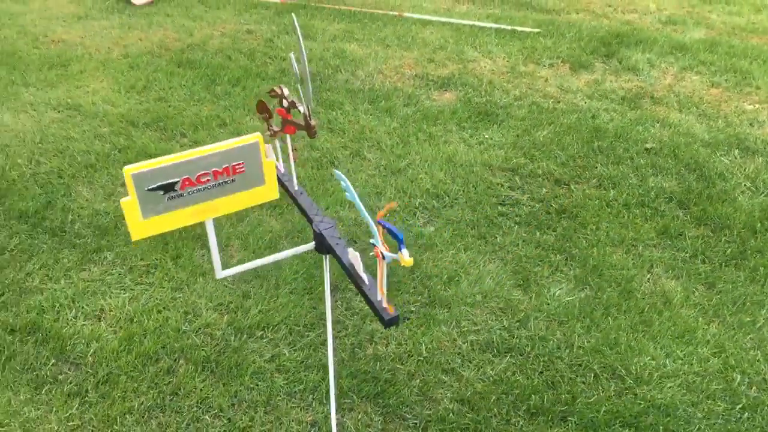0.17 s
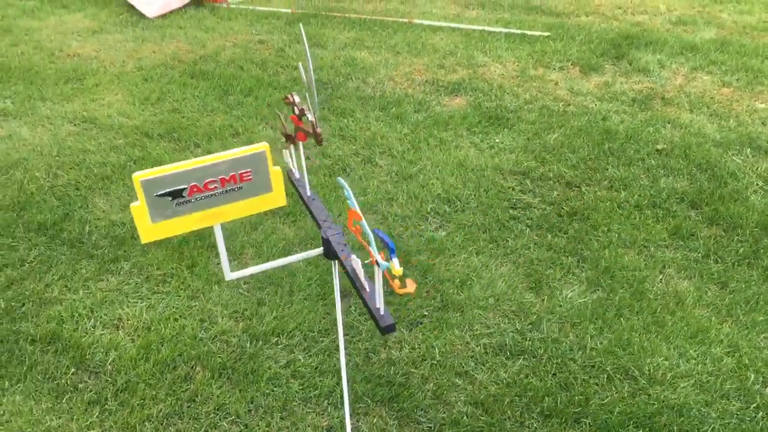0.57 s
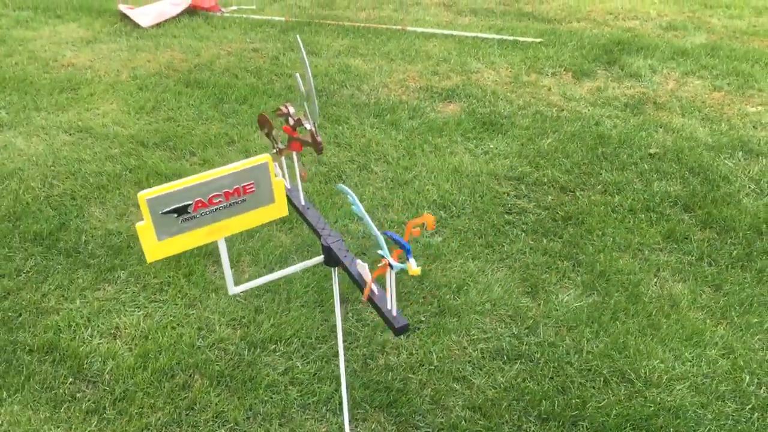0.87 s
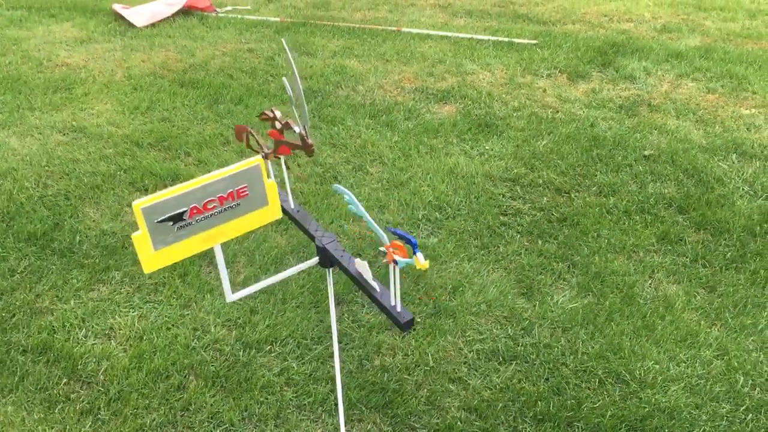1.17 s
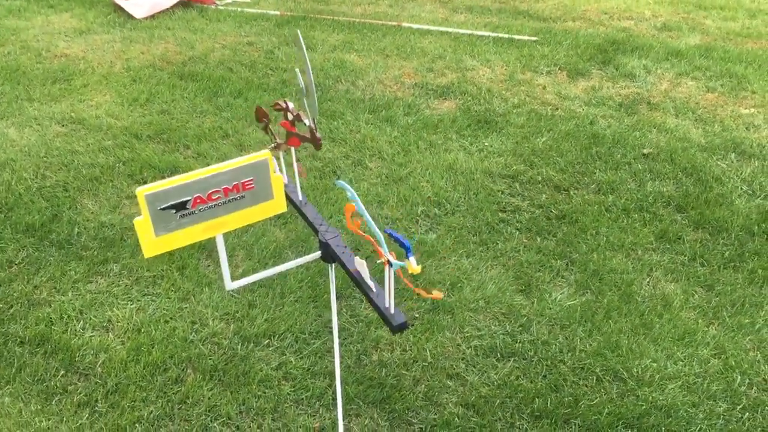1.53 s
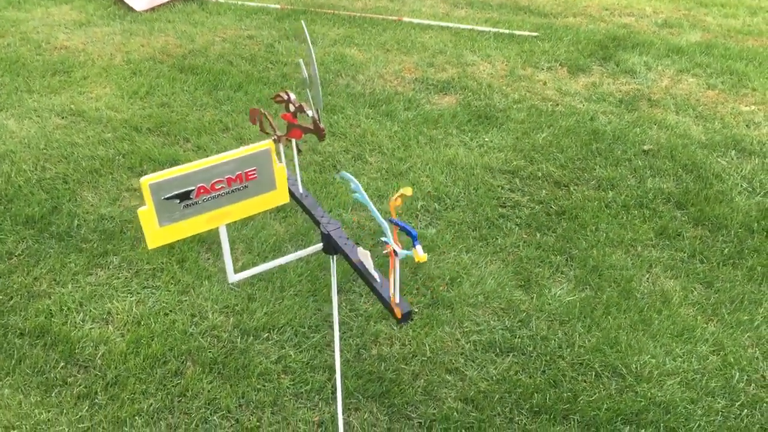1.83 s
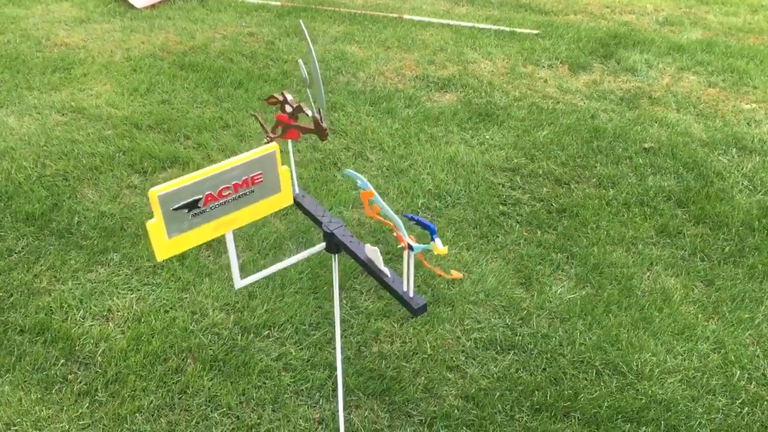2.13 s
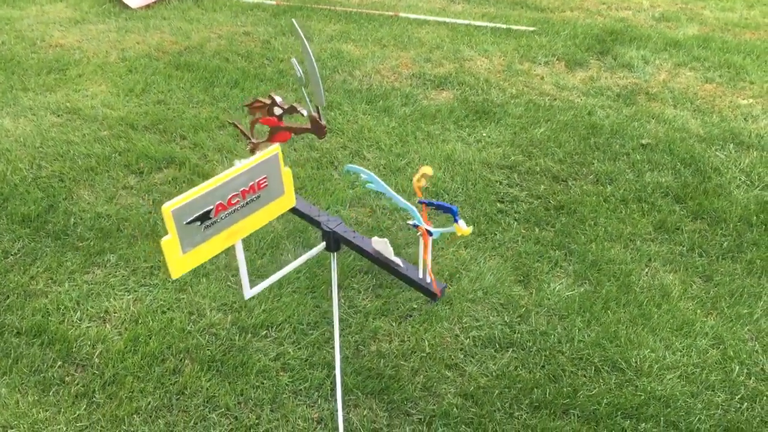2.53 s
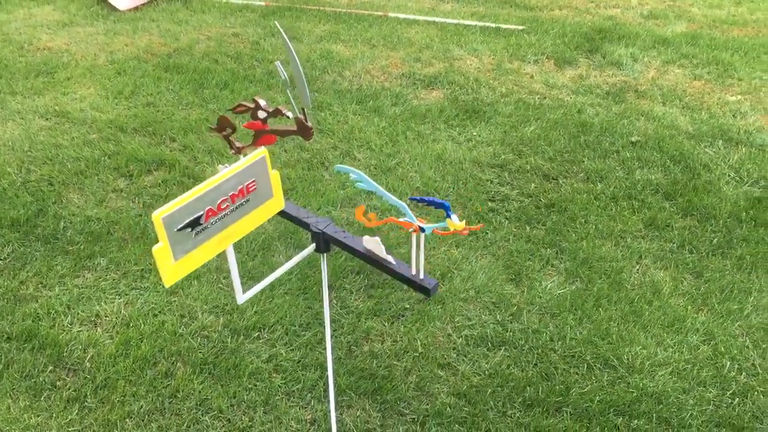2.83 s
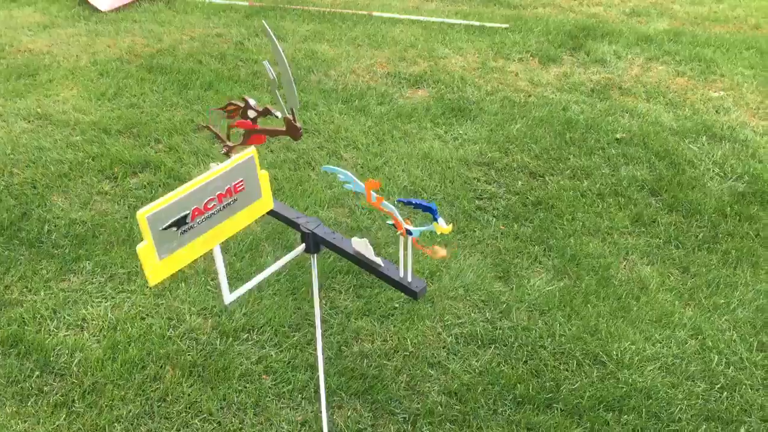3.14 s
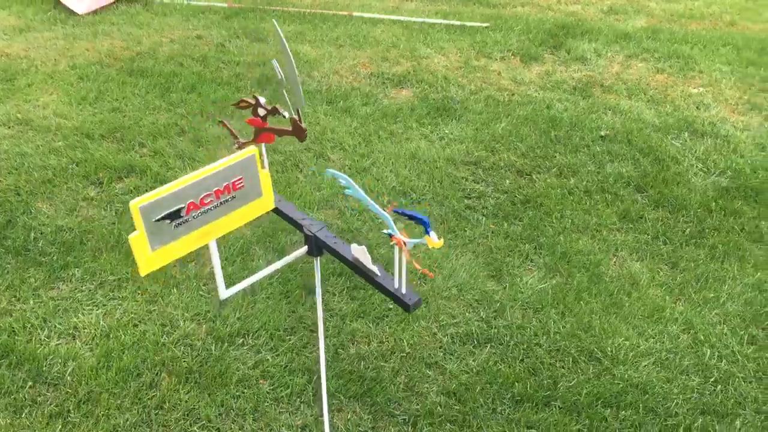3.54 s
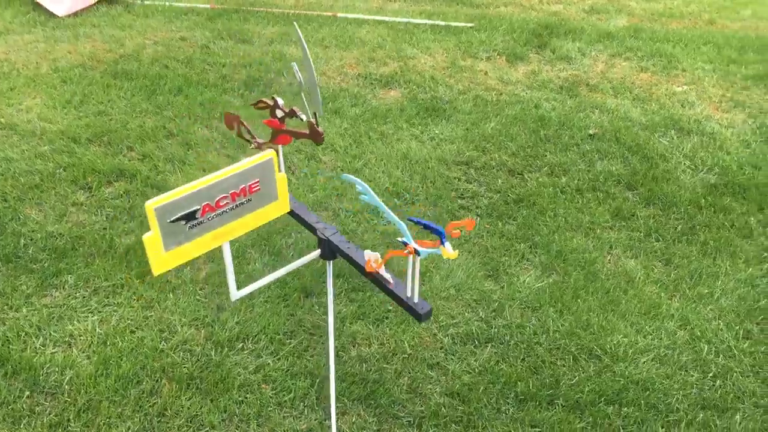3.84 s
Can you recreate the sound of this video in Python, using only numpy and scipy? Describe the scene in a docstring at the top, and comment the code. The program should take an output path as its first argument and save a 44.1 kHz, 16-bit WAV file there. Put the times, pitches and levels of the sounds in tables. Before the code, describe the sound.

Wind rumbling and thudding against a microphone outdoors, over tiny regular axle squeaks and plastic ticks.

```python
"""A lawn in gusty wind: buffets and thumps on a microphone over a low rumble, slowly easing.
Wind is shaped noise read at a varying flow speed, plus single short pressure swings.
A small spinning ornament squeaks on its axle once a turn: gliding tones, narrow-band rasp, scrape noise.
Its loose plastic parts tick as banks of decaying modes.
Behind: a soft rush of open air, faint steady noise with a thin whine, one brief high hiss."""
import sys
import numpy as np
from scipy import signal
from scipy.fft import rfft, irfft
from scipy.io import wavfile
from scipy.ndimage import map_coordinates

SR = 44100
rng = np.random.default_rng(int(sys.argv[2]) if len(sys.argv) > 2 else 0)


def wav_out(sig):
    """Save sig, one row per channel (or a flat mono array), as 16-bit PCM at SR to the path in sys.argv[1]."""
    wavfile.write(sys.argv[1], SR, np.round(np.clip(np.atleast_2d(sig).T, -1, 1) * 32767).astype(np.int16))


N = 176400
T = np.arange(N) / SR

# All spectra are relative: noise() scales them to rms 1.
# wind buffets, before the port high-pass: centre t/s, nominal length/s, level/dB, eddy rate f/Hz
BUFFETS = [(0.025, 0.04, -22.5, 169.2), (0.122, 0.0321, -19, 247.1), (0.163, 0.052, -23, 125.1),
           (0.349, 0.045, -31, 119.1), (0.46, 0.054, -34, 134.7), (0.572, 0.0492, -22, 128.5),
           (0.708, 0.05, -20.5, 117.8), (0.936, 0.055, -23.5, 184), (1.135, 0.039, -26.5, 101),
           (1.208, 0.0475, -30, 115.6), (1.322, 0.027, -22.5, 194.6), (1.444, 0.045, -22.5, 128.3),
           (1.566, 0.034, -23, 134.5), (1.663, 0.049, -32.5, 158.3), (1.758, 0.0269, -27, 185.8),
           (1.845, 0.0407, -29.5, 173.2), (2.205, 0.05, -29, 151.4), (2.29, 0.051, -37, 94.9),
           (2.339, 0.0413, -30.5, 119.6), (2.485, 0.0317, -28.5, 109.5), (2.538, 0.0424, -35, 122.9),
           (2.693, 0.0497, -34.5, 109.1), (2.944, 0.0345, -43.5, 147), (3.051, 0.022, -37.5, 109.4),
           (3.247, 0.11, -39, 111.3), (3.916, 0.043, -36.5, 105.6), (3.962, 0.031, -33.5, 98.5),
           (3.99, 0.0225, -20, 104.8)]
# buffet pressure spectrum at the usual eddy rate: f/Hz, density/dB per Hz
EDDY_SPECTRUM = [(15, -39), (40, -9.5), (85, 2.5), (150, -1.5), (230, -7.5), (350, -19.5), (560, -29),
                 (880, -50.5), (2000, -74), (5000, -99)]
# single tight eddies, before the high-passes: centre t/s, nominal peak/dB, swing f/Hz
THUMPS = [(.007, -10, 237), (0.028, -12, 184), (.113, -15, 230), (.118, -18.5, 540), (0.261, -17, 167),
          (0.333, -21.5, 180), (.44, -20, 198), (.574, -20.5, 223), (.592, -16, 170), (0.669, -24, 144),
          (.721, -7.5, 205), (.809, -23, 135), (0.89, -24, 170), (.919, -18, 260), (0.983, -21.5, 185),
          (1.296, -24, 270), (1.319, -13, 200), (1.412, -18, 123), (1.563, -16, 185), (1.609, -30, 337),
          (1.615, -15, 135), (1.642, -13.5, 200), (1.69, -24, 132), (1.72, -28, 139), (1.76, -16.5, 147),
          (1.797, -16.5, 111), (1.848, -18.5, 252), (2.175, -21.5, 120), (2.202, -15, 164),
          (2.232, -21.5, 168), (2.451, -17, 119), (2.478, -24.5, 138), (2.603, -28.5, 89),
          (2.633, -32, 116), (3.132, -23.5, 114), (3.166, -25.5, 90), (3.29, -26.5, 122), (3.516, -27, 147),
          (3.531, -15, 267)]
# rumble between buffets, before trim and port high-pass: t/s, level/dB
RUMBLE_LEVEL = [(0, -29), (.3, -41.5), (.52, -31), (.8, -58.5), (1.1, -28.5), (1.25, -45.5), (1.38, -32.5),
                (1.87, -36.5), (1.99, -45), (2.1, -39), (2.42, -42.5), (2.73, -35.5), (2.81, -60),
                (3.0, -62), (3.1, -41), (3.33, -37), (3.46, -61.5), (3.57, -34), (3.85, -80), (3.93, -53)]
# rumble spectrum: f/Hz, density/dB per Hz
RUMBLE_SPECTRUM = [(15, -40.5), (33, -14.5), (55, 11.5), (90, 0), (150, -6.5), (250, -20.5), (420, -37.5),
                   (900, -65), (3000, -88)]
# axle squeaks: centre t/s, nominal length/s, tone level/dB, rasp level/dB
SQUEAKS = [(0.057, 0.082, -56, -70.5), (0.505, 0.081, -54, -67.5), (0.907, 0.066, -58, -68),
           (1.292, 0.019, -61.5, -76.5), (2.094, 0.07, -54.5, -66.5), (2.552, 0.11, -66.5, -85),
           (2.995, 0.086, -57, -67.5), (3.42, 0.069, -53.5, -69), (3.831, 0.076, -54.5, -66)]
# dry rubbing of the axle: f/Hz, density/dB per Hz
SCRAPE_SPECTRUM = [(1500, -25), (2800, -2), (3600, -8.5), (4150, 6), (4600, -13.5), (7000, -14),
                   (15000, -19.5)]
# rubs that do not squeak: centre t/s, width/s, level/dB
RUBS = [(1.691, 0.045, -74), (2.518, 0.03, -72.5)]
# plastic ticks: t/s, relative level/dB, treble tilt/dB per 2 octaves, favoured region f/Hz, rattle/s
TICKS = [(0.34, -52, 1, 3770, 0.0026), (0.622, -60, -4, 4080, 0.0018), (1.402, -46.5, -5.5, 5000, 0.0028),
         (1.429, -61, -22, 3960, 0.0033), (1.734, -42, 4.5, 3380, .0013), (2.0865, -59, -1.5, 9070, 0.0023),
         (2.496, -44.5, -11.5, 5000, 0.002), (3.26, -55, -20, 2770, 0.0018)]
# modes of the plastic: f/Hz, relative level/dB, t60/s
PLASTIC_MODES = [(2840, -9.5, 0.042), (3200, -3.5, 0.079), (3966, 2, 0.046), (4310, -4, 0.045),
                 (5410, -6, 0.051), (6390, 2, 0.025), (7460, -4.5, 0.021), (9590, 9.5, 0.015),
                 (9970, 0.5, 0.016), (11250, -6, 0.023), (11800, -3, 0.038), (12500, -8.5, 0.022),
                 (13410, 3.5, 0.026), (14720, -1, .02)]
# rush of air: t/s, level/dB
RUSH_LEVEL = [(0, -51), (.3, -55.5), (.39, -50), (.65, -59), (1.1, -60), (1.33, -51.5), (1.6, -59.5),
              (2.1, -57), (2.7, -62.5), (4, -63.5)]
# rush spectrum: f/Hz, density/dB per Hz
RUSH_SPECTRUM = [(100, 7.5), (400, -2), (750, 2), (1150, -4.5), (1650, -14), (2300, -36), (4000, -35.5),
                 (8000, -69)]
# steady faint background: f/Hz, density/dB per Hz
AIR_SPECTRUM = [(300, -20.5), (700, -1), (1200, -4), (1840, -11.5), (2450, -12.5), (3540, -19), (4700, -22),
                (6200, -22.5), (15700, -33)]
# brief high hiss: f/Hz, density/dB per Hz
HISS_SPECTRUM = [(3000, -17), (9500, -4.5), (15500, 1), (17000, -23)]

# buffet: flow speed at edge and core relative to its eddy rate; level of the wider skirt
USUAL_EDDY_HZ, EDGE_SPEED, CORE_SPEED, SKIRT_DB = 150.2, 0.65, 1.03, -22.5
# unsteady flow: log-speed depth, rate, power law from speed to pressure
FLUTTER_DEPTH, FLUTTER_HZ, FLUTTER_POWER = 0.2137, 66.6, 2.1
THUMP_CYCLES, THUMP_CUT_HZ, THUMP_RAGGED, RAGGED_HZ = 0.43, 71, 0.19, 322
RUMBLE_TRIM_DB, PORT_CUT_HZ = -1.0, 43.3

SQUEAK_HZ, GLIDE_HZ_PER_S, WAVER_RMS = 2270, 800, 0.0057
OCTAVE_DB, THIRD_DB = -1, -15  # overtones relative to the rasp
RASP_LEAD_S, RASP_WIDTH_S = 0.013, 0.017
RASP_HZ, RASP_GLIDE_HZ_PER_S, RASP_BAND_HZ = 4410, 1000, 150
SCRAPE_DB, SCRAPE_LEAD_S, SCRAPE_WIDTH_S = -7, 0.019, 0.048  # dB relative to the rasp

TILT_PIVOT_HZ = 3200
FAVOUR_DB, FAVOUR_OCTAVES, CONTACT_SPREAD_DB = 12, 0.16, 2
CHATTER_DB, CRACK_DB = -7.5, -9.5

AIR_TREBLE_DB, AIR_TREBLE_FROM_HZ = -76, 2500
WHINE_HZ, WHINE_DB = 2442, -85
HISS_FROM_S, HISS_TO_S, HISS_FADE_S, HISS_DB = 0.02, 0.28, 0.025, -76
CUTOFF_HZ = 15900


def amp(db):
    """Decibels to gain."""
    return 10 ** (np.asarray(db) / 20)


def unit(x):
    """Scale to rms 1."""
    return x / np.sqrt(np.mean(x ** 2) + 1e-20)


def curve(points):
    """Gain over time from (t/s, level/dB) points."""
    return amp(np.interp(T, *np.transpose(points)))


def noise(spectrum, size=N):
    """Gaussian noise of rms 1, shaped by dB interpolated over log frequency."""
    f, db = np.transpose(spectrum)
    hz = np.fft.rfftfreq(size, 1 / SR)
    gain = amp(np.interp(np.log(hz + 1), np.log(f), db))
    return unit(irfft(rfft(rng.standard_normal(size)) * gain, size))


def drift(hz, size=N):
    """Random motion of rms 1 with a Gaussian low-pass at about hz."""
    gain = np.exp(-(np.fft.rfftfreq(size, 1 / SR) / hz) ** 2)
    return unit(irfft(rfft(rng.standard_normal(size)) * gain, size))


def bell(x, width):
    """Smooth rise and fall about zero."""
    return np.exp(-(x / width) ** 2)


def highpass(x, order, cut_hz):
    """Butterworth high-pass."""
    return signal.sosfilt(signal.butter(order, cut_hz, "high", fs=SR, output="sos"), x)


def add(mix, start_s, sound):
    """Mix a sound in at start_s, trimmed to the mix."""
    at = round(start_s * SR)
    sound = sound[max(-at, 0):]
    part = mix[max(at, 0):][:len(sound)]
    part += sound[:len(part)]


def wind():
    """Rumble, buffets and thumps on the microphone, whose port sheds the deepest bass."""
    out = rumble()
    pushes = [(centre_s, buffet(*row)) for centre_s, *row in BUFFETS]
    pushes += [(centre_s, thump(*row)) for centre_s, *row in THUMPS]
    for centre_s, push in pushes:
        add(out, centre_s - len(push) / SR / 2, push)
    return highpass(out, 2, PORT_CUT_HZ)


def buffet(length_s, db, eddy_hz, size=16384):
    """Ragged knot of eddies over the port: faster flow pushes harder and shifts the spectrum up."""
    t = (np.arange(size) - size / 2) / SR
    core = np.exp(-abs(t / (0.5436 * length_s)) ** 2.06)
    flutter = np.exp(FLUTTER_DEPTH * np.tanh(drift(FLUTTER_HZ, size=size)))
    speed = eddy_hz / USUAL_EDDY_HZ * (EDGE_SPEED + (CORE_SPEED - EDGE_SPEED) * core) * flutter
    # read the eddy pattern at the flow speed
    eddies = noise(EDDY_SPECTRUM, size=size)
    pressure = map_coordinates(eddies, [np.cumsum(speed)], order=3, mode="grid-wrap")
    swell = core + amp(SKIRT_DB) * bell(t, 4.1 * length_s)
    push = unit(pressure * swell * flutter ** FLUTTER_POWER)
    return amp(db) * push * np.sqrt(np.mean(swell ** 2))


def thump(db, hz, size=4096):
    """One tight eddy: a sharp, ragged pressure swing that leaks away in a slower rebound."""
    cycles = (np.arange(size) - size / 2) / SR * hz
    swing = np.sin(2 * np.pi * (cycles + rng.random())) / np.cosh(2 * cycles / THUMP_CYCLES)
    swing *= 1 + THUMP_RAGGED * drift(RAGGED_HZ, size=size)
    return amp(db) * highpass(swing, 2, THUMP_CUT_HZ)


def rumble():
    """Low wind noise, made lumpy by random gain in dB."""
    lumps = amp(4.4 * drift(47))
    return amp(RUMBLE_TRIM_DB) * curve(RUMBLE_LEVEL) * unit(noise(RUMBLE_SPECTRUM) * lumps)


def axle():
    """Axle scrapes, rasps, then catches into a rising tone; a harder rasp brings out overtones."""
    out, rubbing = np.zeros(N), np.zeros(N)
    waver, shake = drift(150), drift(57)
    grit_cos, grit_sin = drift(RASP_BAND_HZ), drift(RASP_BAND_HZ)
    for centre_s, length_s, db, rasp_db in SQUEAKS:
        near = abs(T - centre_s) < 0.15
        t = T[near] - centre_s
        squeak_hz = SQUEAK_HZ * (1 + WAVER_RMS * waver[near]) + GLIDE_HZ_PER_S * t
        phase = 2 * np.pi * np.cumsum(squeak_hz) / SR
        grip = np.exp(-abs(t / (0.31 * length_s)) ** 3.2) * amp(3.1 * shake[near])
        tone = amp(db) * np.sin(phase)
        tone += amp(rasp_db + OCTAVE_DB) * np.sin(2 * phase)
        tone += amp(rasp_db + THIRD_DB) * np.sin(3 * phase)
        # rasp: narrow noise band on a gliding carrier
        rasp_t = t + RASP_LEAD_S
        carrier = 2 * np.pi * np.cumsum(RASP_HZ + RASP_GLIDE_HZ_PER_S * rasp_t) / SR
        rasp = grit_cos[near] * np.cos(carrier) + grit_sin[near] * np.sin(carrier)
        out[near] += grip * tone + amp(rasp_db) * rasp * bell(rasp_t, RASP_WIDTH_S)
        rubbing[near] += amp(rasp_db + SCRAPE_DB) * bell(t + SCRAPE_LEAD_S, SCRAPE_WIDTH_S)
    for centre_s, width_s, db in RUBS:
        rubbing += amp(db) * bell(T - centre_s, width_s)
    return out + rubbing * noise(SCRAPE_SPECTRUM)


def ticks(size=4096):
    """Loose part rattles for milliseconds; where it lands decides which modes ring most."""
    out, t = np.zeros(N), np.arange(size) / SR
    for start_s, db, tilt_db, favoured_hz, rattle_s in TICKS:
        ring, crack = np.zeros(size), np.zeros(size)
        for hz, mode_db, t60_s in PLASTIC_MODES:
            tilt = tilt_db * np.log2(hz / TILT_PIVOT_HZ) / 2
            favour = FAVOUR_DB * bell(np.log2(hz / favoured_hz), FAVOUR_OCTAVES)
            spread = CONTACT_SPREAD_DB * rng.standard_normal()
            swing = amp(mode_db + tilt + favour + spread) * np.sin(2 * np.pi * (hz * t + rng.random()))
            chatter = 1 + amp(CHATTER_DB) * drift(200, size=size)
            ring += swing * amp(-60 * t / t60_s) * chatter
            crack += swing * drift(900, size=size)
        contact = t / rattle_s
        onset = ring * np.minimum(contact, 1)
        rattle = amp(CRACK_DB) * crack * contact * np.exp(1 - contact)
        add(out, start_s, amp(db) * (onset + rattle) / 4)
    return out


def open_air():
    """Sum of the background layers."""
    return rush() + faint_air() + whine() + hiss()


def rush():
    """Soft rush: shaped noise with fluttering gain."""
    return curve(RUSH_LEVEL) * unit(noise(RUSH_SPECTRUM) * amp(3.0 * drift(22)))


def faint_air():
    """Steady noise, its level set by the part above AIR_TREBLE_FROM_HZ."""
    air = noise(AIR_SPECTRUM)
    treble = highpass(air, 4, AIR_TREBLE_FROM_HZ)
    return amp(AIR_TREBLE_DB) * air / treble.std()


def whine():
    """Thin steady sine with slowly wandering phase."""
    return amp(WHINE_DB) * np.sin(2 * np.pi * WHINE_HZ * T + 0.41 * drift(3.5))


def hiss():
    """High noise under a brief gate with linear fades."""
    gate = np.clip(np.minimum(T - HISS_FROM_S, HISS_TO_S - T) / HISS_FADE_S, 0, 1)
    return amp(HISS_DB) * gate * noise(HISS_SPECTRUM)


def scene():
    """Wind, ornament and open air at one microphone."""
    return (wind() + axle() + ticks() + open_air())[None]


def record(dry):
    """Recorder band limit: linear-phase low-pass."""
    lowpass = signal.firwin(511, CUTOFF_HZ, window=("kaiser", 9), fs=SR)
    return signal.oaconvolve(dry, lowpass[None], "same")


dry = scene()
out = record(dry)
wav_out(out)
```